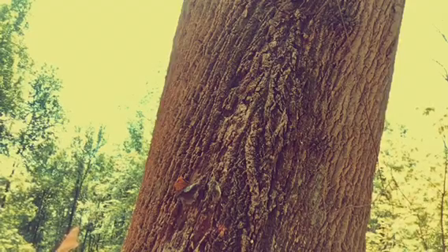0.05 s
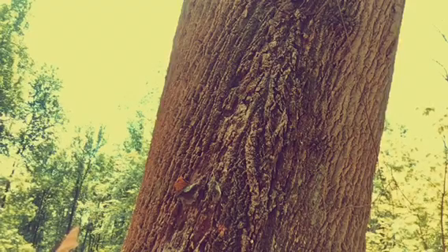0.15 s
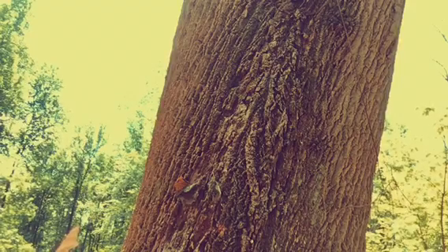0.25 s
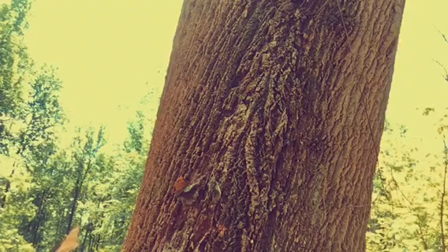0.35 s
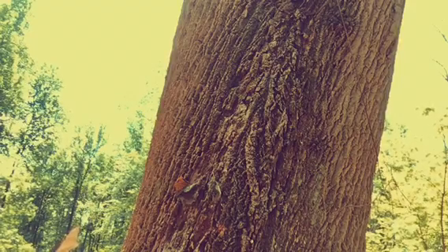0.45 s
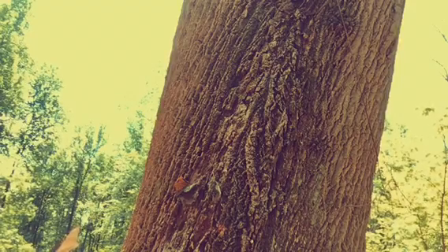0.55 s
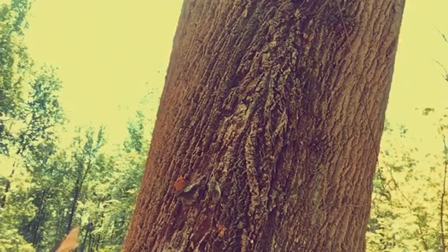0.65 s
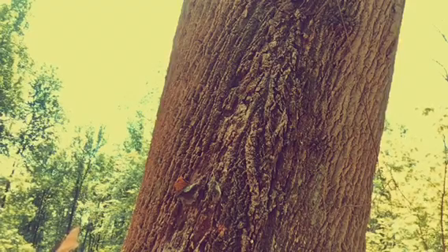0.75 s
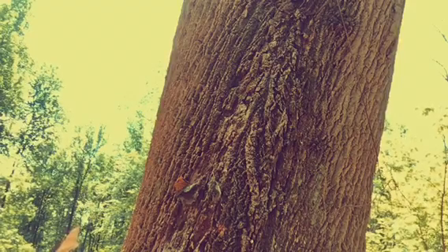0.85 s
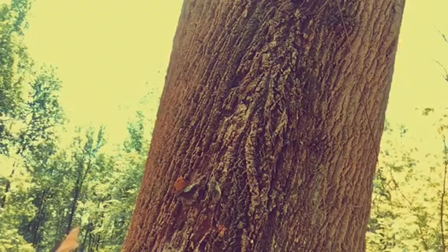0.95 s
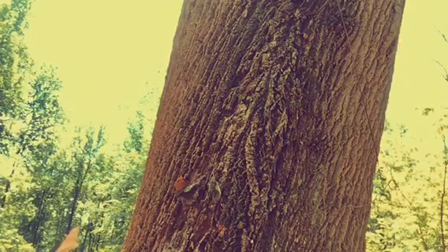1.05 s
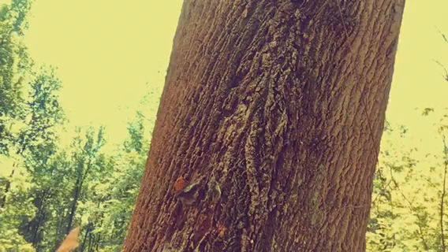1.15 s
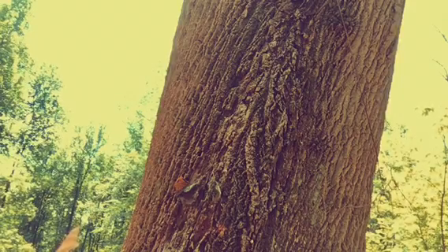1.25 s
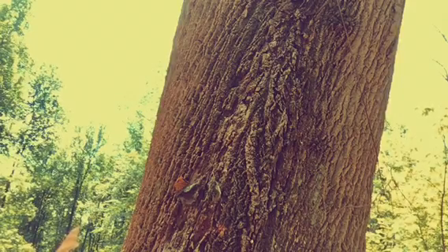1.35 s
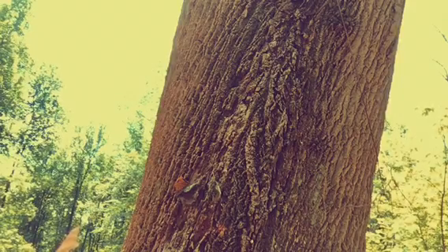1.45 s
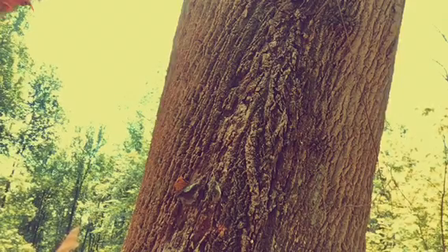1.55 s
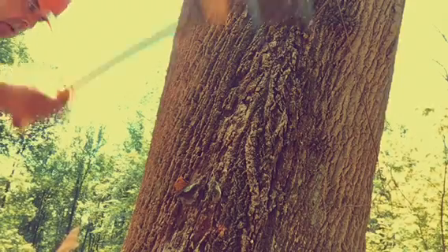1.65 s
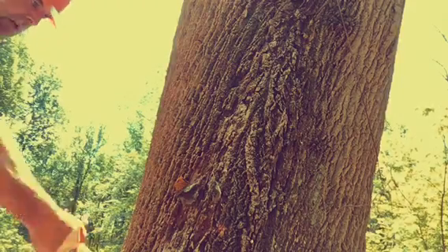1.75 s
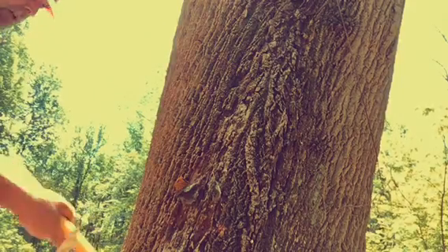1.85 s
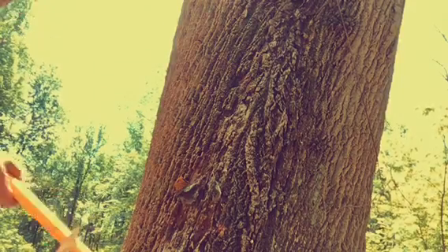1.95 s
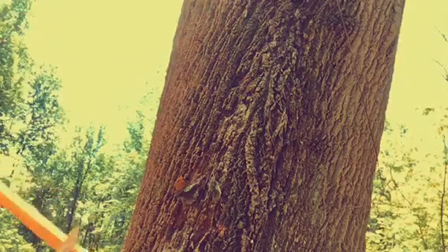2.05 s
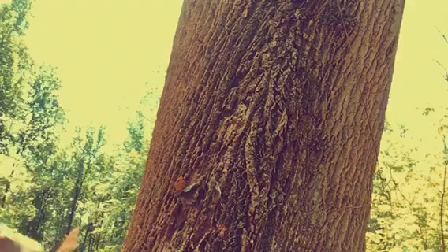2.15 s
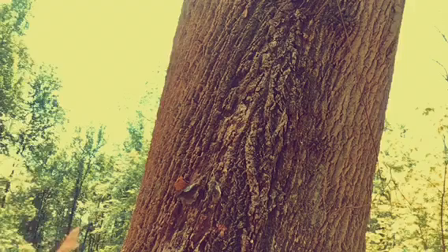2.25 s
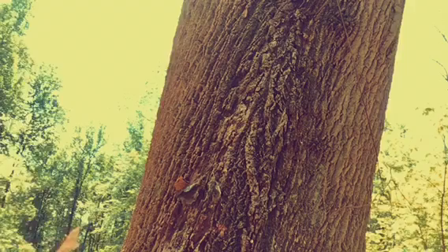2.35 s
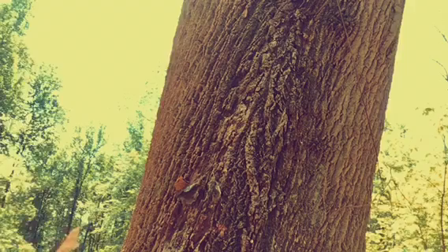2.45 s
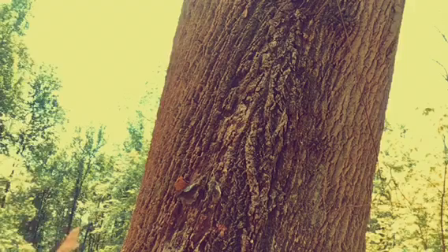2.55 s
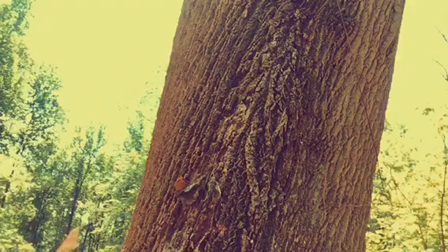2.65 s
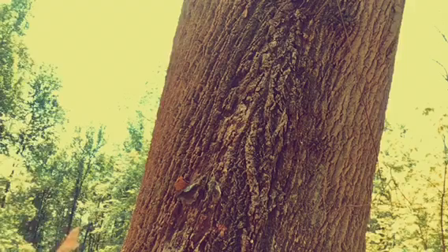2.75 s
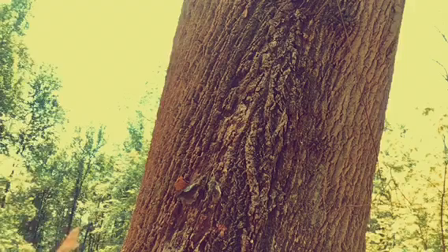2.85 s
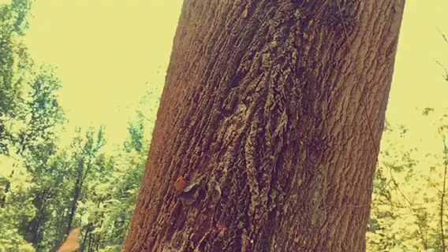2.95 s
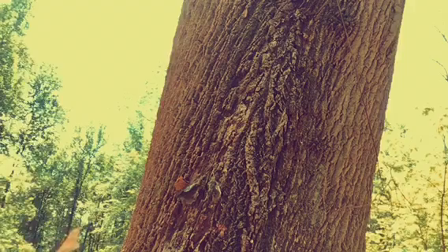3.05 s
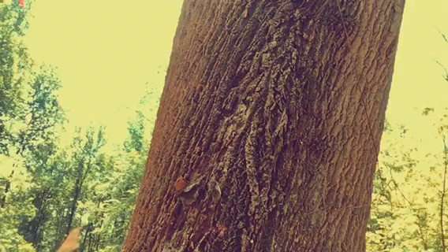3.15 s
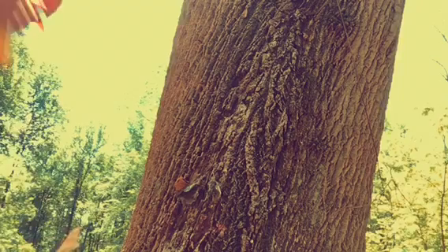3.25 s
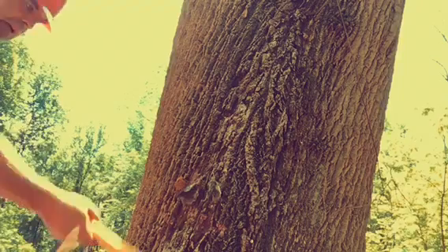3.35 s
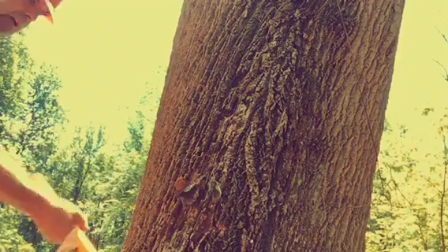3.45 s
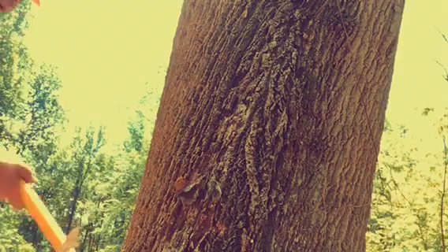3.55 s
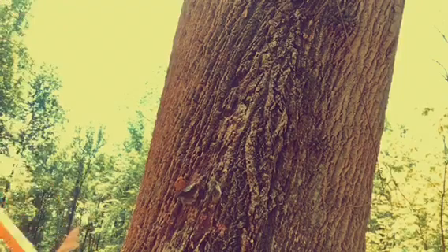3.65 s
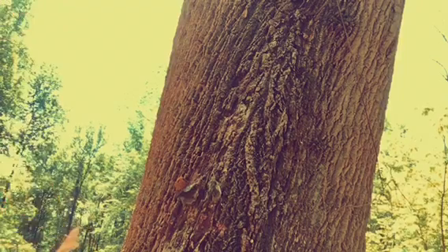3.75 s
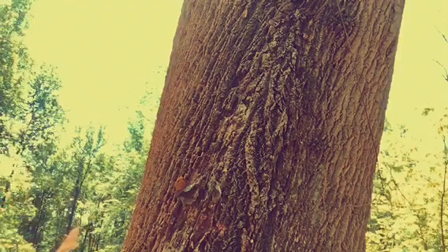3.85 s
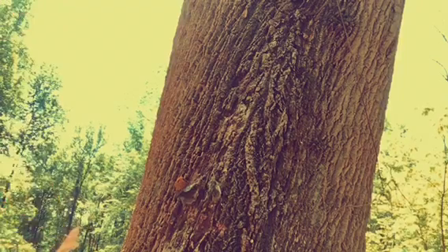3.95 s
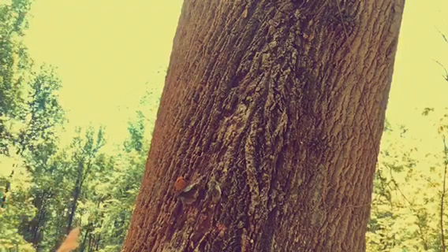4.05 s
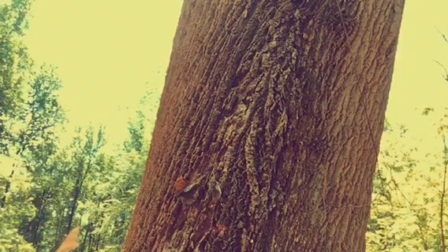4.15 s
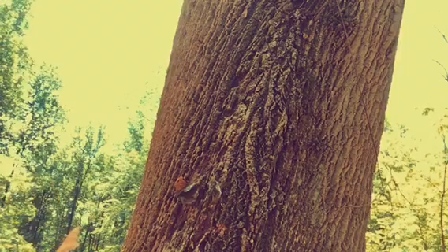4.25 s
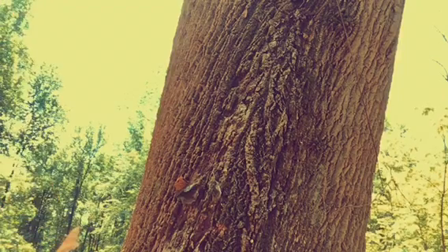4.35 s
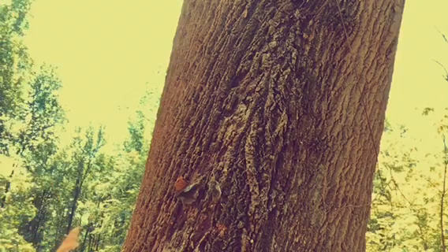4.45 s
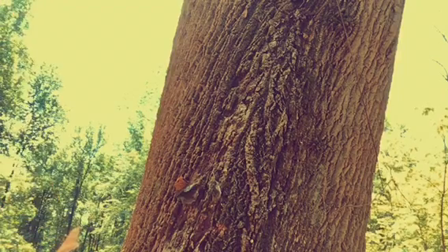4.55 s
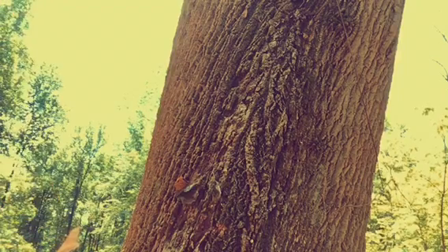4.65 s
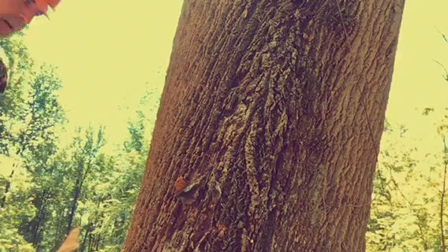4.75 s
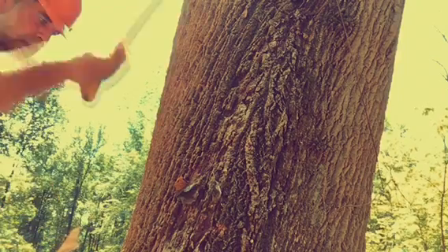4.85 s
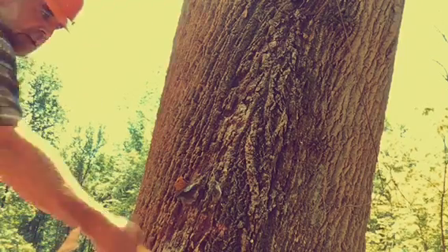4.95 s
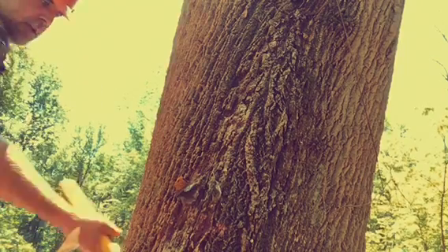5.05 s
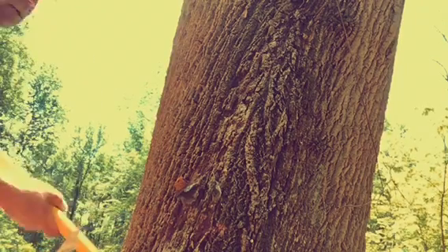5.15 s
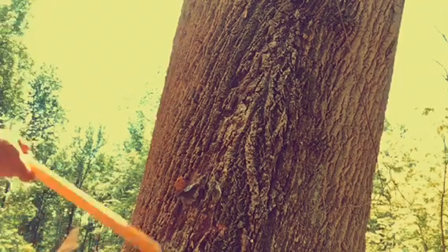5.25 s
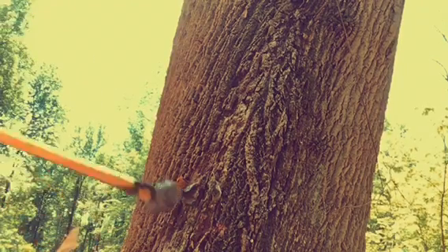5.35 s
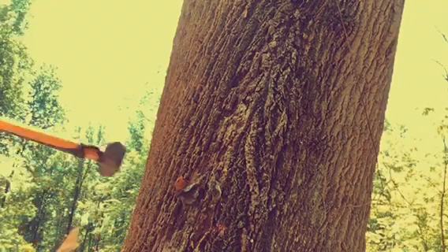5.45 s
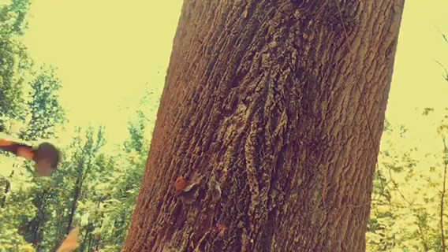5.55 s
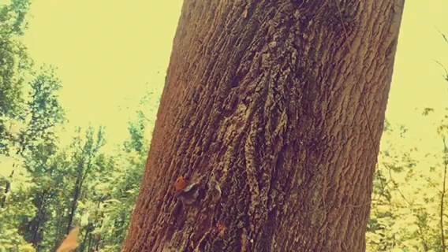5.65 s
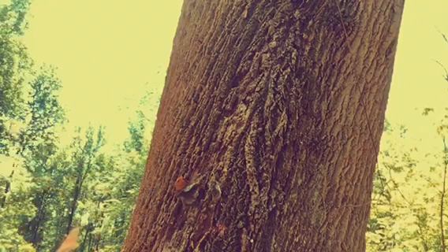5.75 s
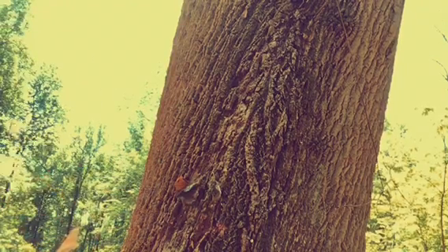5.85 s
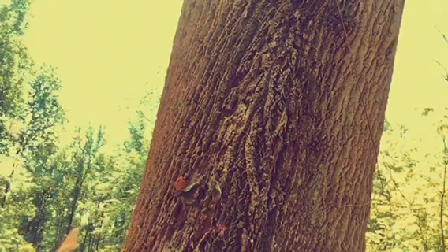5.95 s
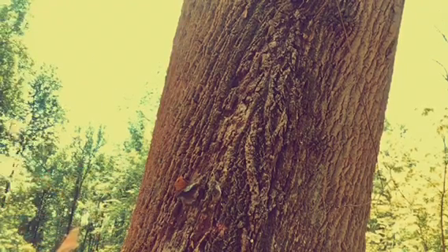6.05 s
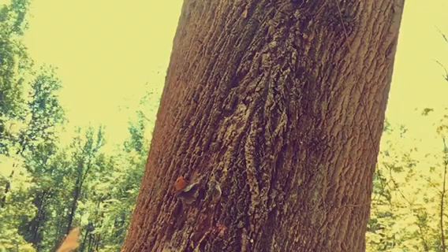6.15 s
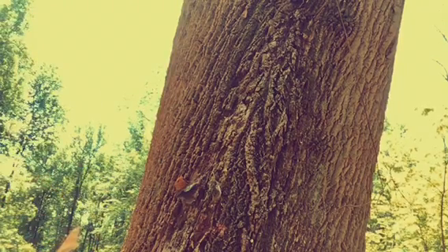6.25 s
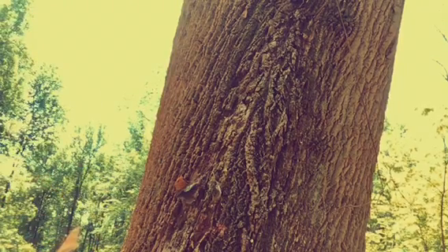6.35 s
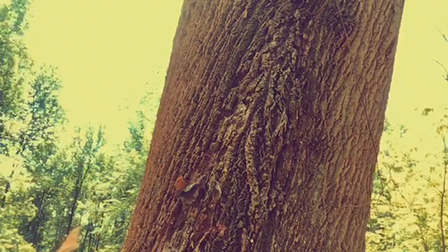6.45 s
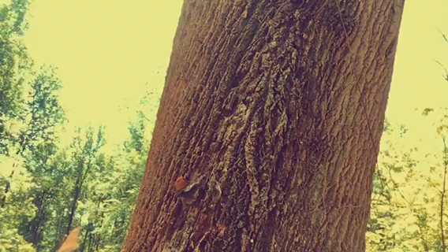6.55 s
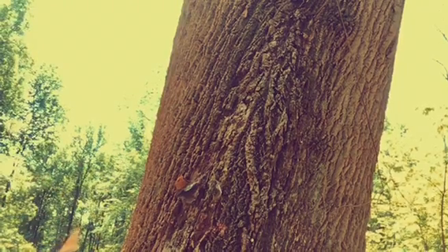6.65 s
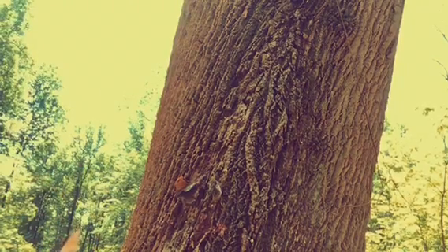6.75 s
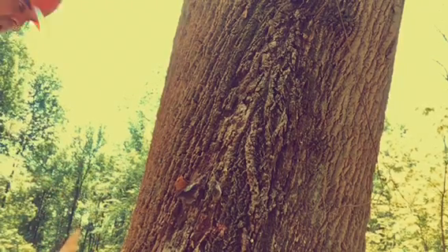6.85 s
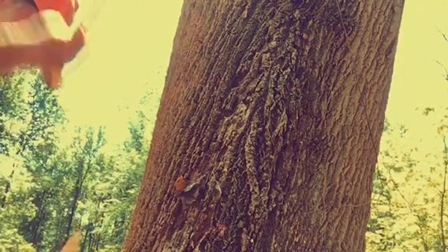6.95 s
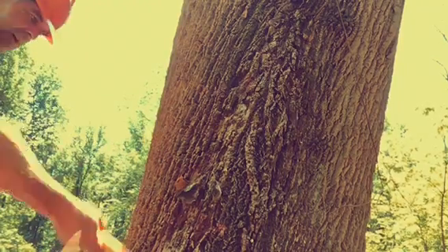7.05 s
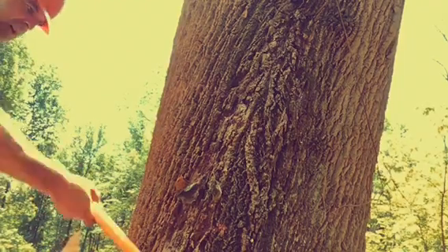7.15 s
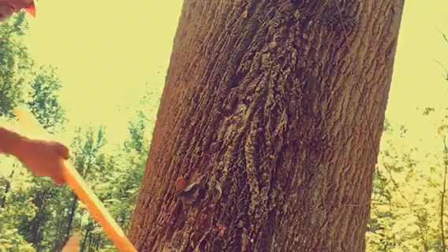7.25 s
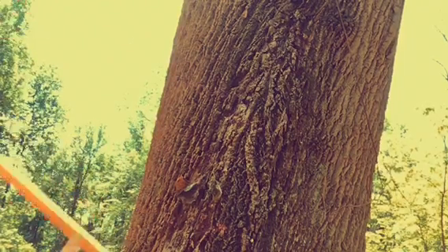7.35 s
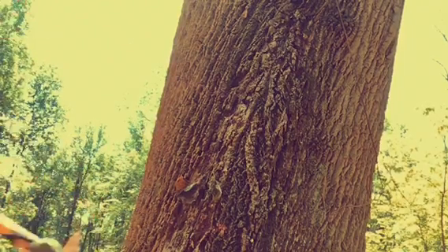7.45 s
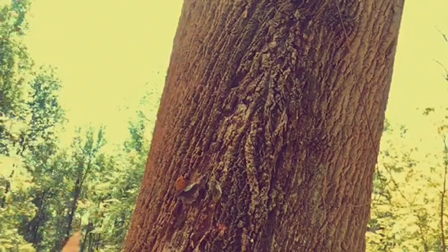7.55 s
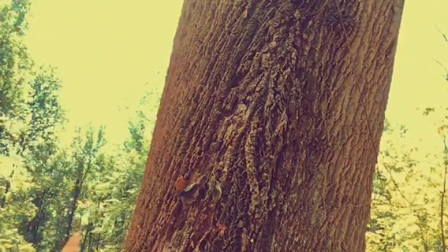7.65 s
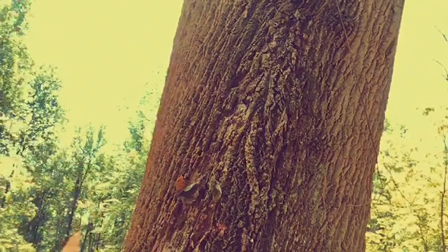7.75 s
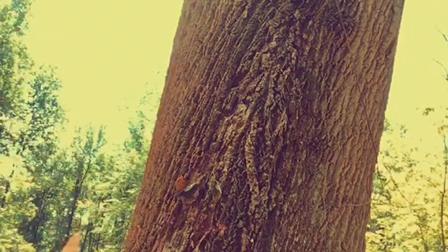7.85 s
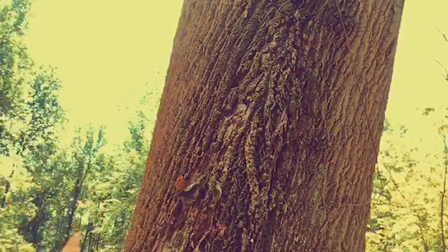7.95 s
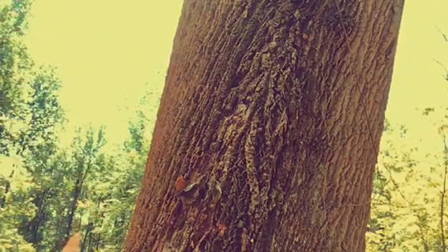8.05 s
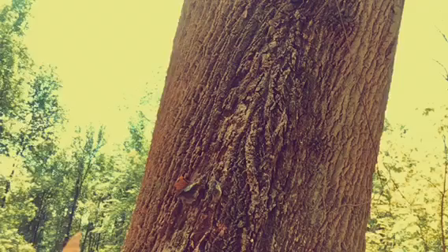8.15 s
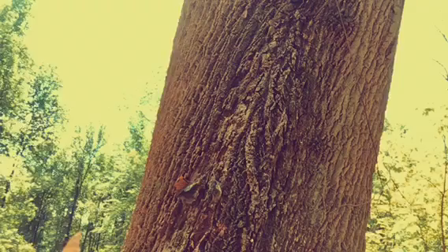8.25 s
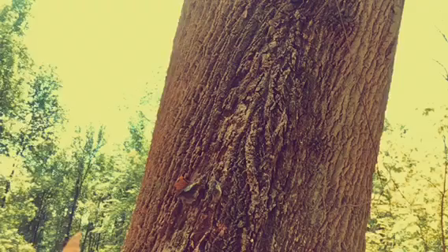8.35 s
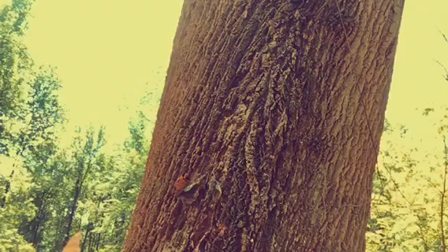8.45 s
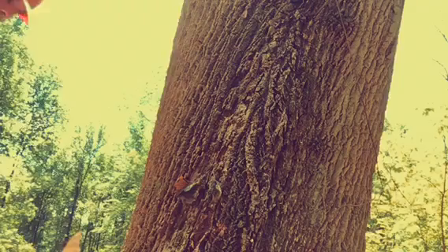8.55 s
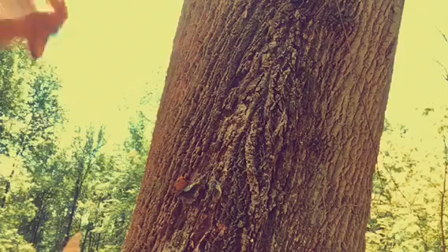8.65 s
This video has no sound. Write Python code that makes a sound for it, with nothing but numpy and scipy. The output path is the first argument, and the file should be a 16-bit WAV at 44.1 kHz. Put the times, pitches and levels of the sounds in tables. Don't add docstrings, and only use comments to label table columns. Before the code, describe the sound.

An axe chops a big tree four times, sharp overloaded cracks with woody thuds and forest echo, twigs snapping and leaf litter crackling between.

```python
import sys
import numpy as np
from scipy import signal
from scipy.fft import rfft, irfft
from scipy.io import wavfile

SR = 44100
rng = np.random.default_rng(int(sys.argv[2]) if len(sys.argv) > 2 else 0)


def to_wav(sig):
    pcm = np.clip(np.atleast_2d(sig), -1, 1) * 32767
    pcm = np.round(pcm).astype(np.int16)
    wavfile.write(sys.argv[1], SR, pcm.T)


def makeup_ratio(level_db):
    decades = np.asarray(level_db, float) / 20
    return 10 ** decades


N = 383229

# (t/s, crack level/dB, crack t60/s, knock level/dB, thud level/dB)
BLOWS = [
    (1.8258, 29.5, 0.026, 9.5, 2),
    (3.4549, 24.5, 0.017, 4.5, 19),
    (5.0436, 12, 0.042, 10, 4.5),
    (7.1410, 12.5, 0.041, 12.5, 6.5),
]
# (start t/s, end t/s, hiss level/dB, dull part over hiss/dB)
SHOWERS = [(0, 0.084, -53, -12), (0.384, 0.431, -44.5, -26), (0.771, 0.801, -36.5, -16),
           (0.809, 0.845, -41.5, -17), (1.021, 1.16, -41.5, -6.5), (2.51, 2.51, -29, -20),
           (2.533, 2.581, -24.5, -10.5), (4.331, 4.37, -43, -22), (4.777, 4.88, -46, -40),
           (4.925, 4.962, -42.5, -12), (5.389, 5.491, -29.5, -17), (6.029, 6.121, -33.5, -23),
           (7.082, 7.122, -46.5, 12), (7.884, 7.903, -34, -16)]
# (t/s, peak level/dB, centre f/Hz, pitch strength/dB)
TWIGS = [(0.77, -29, 2760, 8), (0.777, -21, 3200, 6), (0.789, -25, 2970, -3), (0.8012, -25, 4200, 3),
         (0.8253, -24, 4130, 5.5), (0.8295, -24, 4200, 7), (0.8395, -28, 4000, 3), (1.131, -19.5, 2290, 10),
         (1.783, -32, 3840, 21), (2.5133, -8.5, 3000, -2), (2.517, -14, 6000, -1), (2.5195, -13.5, 7200, 3),
         (2.522, -18, 7000, 2), (2.5404, -15, 4180, 2), (2.5563, 1.5, 4200, -6), (2.568, -1.5, 3300, -1.5),
         (2.572, -5, 3000, -0.5), (2.5748, -6, 4000, -6), (2.585, -13, 1500, 4), (2.595, -15, 4300, 3),
         (2.6309, -24, 5500, 5), (4.644, -10, 7000, -11.5), (5.4008, -17, 4500, -17), (5.405, -11, 1800, 7),
         (5.414, -6, 3800, -5), (5.417, -7, 1900, 6), (5.43, -12.5, 8900, 5.5), (5.432, -14, 1800, 9),
         (5.44, -9, 4000, -3), (5.4448, -0.5, 3700, -11), (5.4575, -7, 7000, -8), (5.4735, -10, 7500, -9),
         (5.4752, -11, 1780, 5), (5.4845, -20, 2500, -6), (5.4896, -10, 4500, -8),
         (5.647, -7.5, 1580, -3.5), (5.9588, -16, 8270, -13), (6.0402, -18.5, 2800, 2),
         (6.046, -15, 4000, 7), (6.051, -17, 3500, 10), (6.054, -16, 3000, 6), (6.069, -18, 2200, 5),
         (6.083, -17, 3700, 1), (6.1026, -12.5, 2170, 10.5), (6.1227, -18, 2540, 13),
         (6.1267, -17.5, 2400, 10), (6.828, -36, 6100, 11.5), (7.0848, -31, 2460, 16), (7.74, -1, 5670, 1),
         (7.7858, -11.5, 3700, -10), (7.887, -17.5, 5040, 11), (7.9144, -13.5, 3540, -1),
         (8.013, -29, 1760, 15)]
TICK_HZ, TICK_BUMP_DB = 2350, -12
TICK_T60_S, TWIG_T60_S = .013, .022


def rms_one(x):
    return x / np.sqrt(np.mean(x ** 2) + 1e-20)


def dying(t, t60):
    return (t >= 0) * makeup_ratio(-60 * np.maximum(t, 0) / t60)


def coloured(points, size=N):
    hz, level_db = np.transpose(points)
    f = np.maximum(np.fft.rfftfreq(size, 1 / SR), 1)
    gain = makeup_ratio(np.interp(np.log(f), np.log(hz), level_db, left=-60, right=-60))
    return rms_one(irfft(rfft(rng.standard_normal(size)) * gain, size))


def resonance(x, hz, width):
    r = np.exp(-np.pi * width / SR)
    poles = [1, -2 * r * np.cos(2 * np.pi * hz / SR), r * r]
    return signal.lfilter([(1 - r * r) / 2, 0, (r * r - 1) / 2], poles, x)


def drift(rate):
    knots = np.arange(0, N / SR + 1, 1 / rate)
    return np.interp(np.arange(N) / SR, knots, rng.standard_normal(len(knots)))


def add(out, s, x):
    i = round(s * SR)
    out[i:i + len(x)] += x[:N - i]


def bitten(x, bite):
    out = makeup_ratio(-19.0) * x
    for k, (hz, width, level_db) in enumerate(bite):
        out = out + (-1) ** k * makeup_ratio(level_db + 5.5) * resonance(x, hz, width)
    return out


def trunk_ring(t):
    # (f/Hz, level/dB, t60/s, direction of first swing)
    trunk_modes = [(42.1, 8.7, 0.119, 1), (54.4, -17.8, 0.764, -1), (64.3, -15.1, 0.96, -1),
                   (72.8, 10.4, 0.185, -1), (77.4, -19.8, 1.0, -1), (88.5, 5.1, 0.183, -1),
                   (95.0, 1.9, 0.331, 1), (105.5, 1.7, 0.298, 1), (115.3, -0.2, 0.235, 1),
                   (129.3, -3.8, 0.326, 1), (144.9, 8.9, 0.138, 1), (155.5, 2.7, 0.211, 1),
                   (187.6, -3.0, 0.146, -1), (215.4, -2.7, 0.242, -1), (231.8, 3.7, 0.127, -1),
                   (257.5, 1.1, 0.113, -1), (295.1, -37.8, 0.652, 1)]
    ring = 0
    for hz, level_db, t60, way in trunk_modes:
        ring = ring + way * makeup_ratio(level_db) * np.sin(2 * np.pi * hz * t) * dying(t, t60)
    return ring * np.minimum(t / 0.037, 1) ** 3.6


def blows():
    # (f/Hz, width/Hz, level/dB)
    bites = [
        [(1520, 380, 4), (2130, 500, 3), (3920, 780, -5), (5530, 2100, -7.5), (6590, 210, -4)],
        [(990, 1000, 1), (8720, 500, -7), (3500, 800, 1.5), (12000, 2500, -11), (4800, 1500, -1)],
        [(1110, 1030, 5.5), (2240, 150, -16), (3670, 170, -10), (6100, 2200, 0), (8500, 160, 4.5)],
        [(1130, 390, 0), (2145, 270, 0), (3750, 460, 2), (6160, 780, -31), (7000, 400, -17.5)],
    ]
    # (knock f/Hz, knock lag/s, thud f/Hz, thud lag/s, splinter level/dB)
    bodies = [(241, 0.0055, 56, 0.011, 8.5), (245, 0.0197, 80, 0.00068, 1.5),
              (258, 0.00907, 57, 0.0068, 11.5), (254, 0.00397, 66, 0.00774, 8)]
    # (f/Hz, width/Hz, t60/s)
    splinters = [(340, 290, 0.063), (445, 290, 0.057), (376, 187, 0.053), (382, 160, 0.066)]
    thud_decays = [0.098, 0.082, 0.15, 0.13]
    knock_decays = [0.056, 0.047, 0.044, 0.055]
    # (t/s, level/dB)
    trunk_swings = [(1.8303, 1.5), (3.4535, .5), (5.0426, 3), (7.1396, -.5)]
    # (t/s, f/Hz, level/dB, rise/s)
    early_push = (3.4443, 70, -5, .011)

    out, t = np.zeros(N), np.arange(SR) / SR
    short = t[:SR // 4]
    trunk = trunk_ring(t)
    for k, (s, crack_db, crack_t60, knock_db, thud_db) in enumerate(BLOWS):
        crack_noise, splinter_noise = rng.standard_normal((2, SR // 4))
        knock_hz, knock_lag, thud_hz, thud_lag, splinter_db = bodies[k]
        splinter_hz, splinter_width, splinter_t60 = splinters[k]

        crack = crack_noise * dying(short, crack_t60) * np.minimum(short / .0007, 1)
        add(out, s, makeup_ratio(crack_db) * bitten(crack, bites[k]))

        splinter = resonance(splinter_noise * dying(short, splinter_t60), splinter_hz, splinter_width)
        add(out, s + .004, makeup_ratio(splinter_db + 12.5) * splinter)

        knock = np.sin(2 * np.pi * knock_hz * short) * dying(short, knock_decays[k])
        add(out, s + knock_lag, makeup_ratio(knock_db) * knock * np.minimum(short / 0.0037, 1))

        thud = np.sin(2 * np.pi * thud_hz * short) * dying(short, thud_decays[k])
        add(out, s + thud_lag, makeup_ratio(thud_db) * thud * np.minimum(short / 0.005, 1) ** 2)

        swing_s, swing_db = trunk_swings[k]
        add(out, swing_s, makeup_ratio(swing_db) * trunk)

    s, hz, level_db, rise = early_push
    push = np.sin(2 * np.pi * hz * t) * np.minimum(t / rise, 1) * dying(np.maximum(t - rise, 0), .025)
    add(out, s, -makeup_ratio(level_db) * push)
    return out


def steel():
    # (t/s, then level/dB of each mode)
    steel_hits = [
        (1.895, -35.5, -56, -58),
        (3.48, -48, -49, -36),
        (5.062, -30, -27, -23),
        (7.17, -54, -61, -56),
    ]
    # (f/Hz, t60/s)
    steel_modes = [(9530, 0.9), (8100, 0.1), (12600, 0.14)]
    out, t = np.zeros(N), np.arange(SR) / SR
    for s, *levels_db in steel_hits:
        for (hz, t60), level_db in zip(steel_modes, levels_db):
            pair = np.sin(2 * np.pi * hz * t) + 0.25 * np.sin(2 * np.pi * (hz + 17) * t)
            add(out, s, makeup_ratio(level_db) * pair * dying(t, t60) * np.minimum(t / 0.0027, 1))
    return out * makeup_ratio(3.5 * drift(45))


def snaps(rows, low_hz, high_hz):
    out, t = np.zeros(N), np.arange(4000) / SR
    for s, peak_db, hz, t60, bump_db in rows:
        burst = rng.standard_normal(len(t)) * dying(t, t60)
        burst[0] += 1.8
        bump = resonance(burst * dying(t, 0.29), hz, 0.18 * hz)
        add(out, s, makeup_ratio(peak_db - 16.5) * (burst + makeup_ratio(bump_db + 13.0) * bump))
    return signal.sosfilt(signal.butter(2, [low_hz, high_hz], "band", fs=SR, output="sos"), out)


def grazes():
    # (t/s, peak level/dB, centre f/Hz, t60/s, bump level/dB)
    bark_grazes = [(1.8085, -4, 1520, 0.018, -2), (1.82, -5, 1710, .03, -2), (3.4324, 5, 1700, 0.012, -6),
                   (3.4362, -3, 2300, 0.014, 0), (3.4440, 1.5, 1420, 0.0093, 2), (5.021, -3, 900, 0.022, 0),
                   (5.0326, -7, 1500, 0.02, -5), (7.1130, -20.5, 600, 0.024, 15),
                   (7.1180, -8.5, 7200, 0.0077, 1.5), (7.1185, -6.5, 3670, 0.009, 11.5),
                   (7.1297, -7, 3600, 0.0083, 5.5)]
    return snaps(bark_grazes, low_hz=400, high_hz=14000)


def tearing():
    # (length/s, level/dB)
    tears = [
        (0.088, -37),
        (.095, -38),
        (.095, -30),
        (.085, -41),
    ]
    # (f/Hz, level/dB per Hz)
    tear_colour = [(500, 1), (2000, 3), (4000, 2), (8000, -8), (12000, -9), (16000, -16)]
    t, gain = np.arange(N) / SR, 0
    for (s, *_), (length, level_db) in zip(BLOWS, tears):
        fade = makeup_ratio(level_db - 9 * (t - s) / length * (t < s + length))
        gain = gain + fade * (t > s) * dying(np.maximum(t - s - length, 0), .05)
    return gain * makeup_ratio(3.0 * drift(120)) * coloured(tear_colour)


def wood_echo():
    # (f/Hz, near trees level/dB, near t60/s, far edge level/dB, far t60/s)
    wood_bands = [(413, 9.5, 0.25, -23.5, 3.4), (927, -0.5, 0.39, -11, 2.53), (1870, 5, 0.4, -10, 2.22),
                  (4200, 2, 0.44, -17, 1.63), (7500, 8, 0.26, -16, 0.89), (14000, 14, 0.16, -36.5, .7)]
    front_s, far_edge_s = .203, .25
    t, near, far = np.arange(round(1.5 * SR)) / SR, 0, 0
    arrival = np.where(t < front_s, .55 * (t / front_s) ** 2, 1)
    for hz, near_db, near_t60, far_db, far_t60 in wood_bands:
        band = resonance(resonance(rng.standard_normal(len(t)), hz, hz), hz, hz) / np.sqrt(hz / 1000)
        near = near + band * makeup_ratio(near_db) * dying(t - .006, near_t60)
        far = far + band * makeup_ratio(far_db) * arrival * dying(np.maximum(t - far_edge_s, 0), far_t60)
    return near, far


def banded(x, bands):
    f, power = np.fft.rfftfreq(len(x), 1 / SR), 1
    for hz, width, lift_db in bands:
        power = power + makeup_ratio(2 * lift_db) / (1 + np.abs(2 * (f - hz) / width) ** 3)
    return irfft(rfft(x) * np.sqrt(power), len(x))


def echoes():
    # (near trees level/dB, far edge level/dB)
    echo_levels = [
        (-17.5, -15),
        (-20, -19.5),
        (-15.5, -18),
        (-28.5, -25),
    ]
    # (f/Hz, width/Hz, level over the broad echo/dB)
    echo_bands = [
        [(955, 1300, -1.5), (1870, 430, 4), (3930, 470, 4.5), (5970, 480, 6), (7000, 600, 4.5)],
        [(3300, 680, 11.5), (4400, 500, 14.5), (6000, 770, 12), (8450, 450, 8.5), (11900, 400, 4)],
        [(1300, 600, -5), (2000, 600, -14), (3900, 920, 7), (6370, 1000, 5.5), (12700, 250, 13)],
        [(1100, 970, 9.5), (2090, 310, 10.5), (3800, 740, 16), (5640, 1200, 6.5), (7200, 800, 5)],
    ]
    out, (near, far) = np.zeros(N), wood_echo()
    for (s, *_), (near_db, far_db), bands in zip(BLOWS, echo_levels, echo_bands):
        add(out, s, banded(makeup_ratio(near_db) * near + makeup_ratio(far_db) * far, bands))
    return out


def ticks():
    # (t/s, peak level/dB)
    bark_ticks = [(0.05, -24), (0.33, -21.5), (0.7847, -9), (1.047, -14), (1.5469, -23), (1.61, -21.5),
                  (1.671, -29), (2.4107, -11.5), (2.427, -13.5), (2.799, -15), (3.04, -22), (3.148, -16.5),
                  (3.28, -14.5), (4.1365, -12.5), (4.1729, -19), (4.344, -21), (4.5586, -11.5),
                  (4.7116, -14.5), (4.784, -21), (4.8643, -21), (4.9382, -26), (5.5844, -26), (5.6294, -11),
                  (5.709, -26), (5.7661, -13), (5.968, -8), (6.179, -13.5), (7.0057, -22), (7.759, -17),
                  (8.3587, -28)]
    return [(s, peak_db, TICK_HZ, TICK_T60_S, TICK_BUMP_DB) for s, peak_db in bark_ticks]


def twigs():
    return [(s, peak_db, hz, TWIG_T60_S, bump_db) for s, peak_db, hz, bump_db in TWIGS]


def landings():
    gap_s, rows = .014, []
    for start, end, hiss_db, dull_db in SHOWERS:
        if dull_db >= 0:
            continue
        jitter, size, pitch = rng.standard_normal((3, 12))
        times = start + gap_s * (np.arange(12) + .25 * jitter)
        for s, strength, tune in zip(times, size, pitch):
            free = min(abs(s - twig[0]) for twig in TWIGS) > gap_s
            if start <= s < end and free:
                rows.append((s, hiss_db + 17 + 3.5 * strength, 2600 * 1.25 ** tune, TWIG_T60_S, 0))
    return rows


def strays():
    rows = []
    for s, *_ in BLOWS:
        for delay in rng.exponential(.6, 14):
            if s + .3 + delay < N / SR - .1:
                rows.append((s + 0.35 + delay, -44, TICK_HZ, TICK_T60_S, TICK_BUMP_DB))
    return rows


def crumbs():
    # (t/s, peak level/dB, centre f/Hz, pitch strength/dB)
    more_crumbs = [(0.826, -13, 4100, -2), (0.87, -23, 6000, -3), (0.9, -22, 4500, 0),
                   (1.1, -22, 5000, -3.5), (1.13, -20, 1500, 11), (1.15, -24, 5000, -3),
                   (2.606, -18, 9000, -6), (2.648, -22, 7000, -4.5), (2.658, -22, 8000, -4),
                   (2.672, -19, 6000, -4), (2.7014, -18, 4500, -5), (2.7288, -23, 5000, -5),
                   (2.738, -23.5, 9000, -9), (2.7792, -23, 3490, -2), (2.8316, -24, 1730, 0),
                   (3.975, -41, 9000, 11), (4.183, -28.5, 3000, -3), (5.36, -19, 9500, 1),
                   (5.505, -12, 6000, -4.5), (5.53, -19.5, 8000, -4), (5.9578, -22, 12000, -3),
                   (6.1673, -26, 1730, 8), (6.033, -21, 4000, 3), (6.036, -21, 9000, -5),
                   (7.0848, -18, 2400, 3), (7.695, -36, 8000, -0.5), (7.724, -31, 5000, -3),
                   (7.741, -11, 2200, -2), (7.7405, -10, 7500, -2), (7.889, -20, 1800, 5),
                   (7.852, -26, 11000, 0), (7.87, -21, 4000, -0.5)]
    rows = [(s, peak_db, hz, TICK_T60_S, bump_db) for s, peak_db, hz, bump_db in more_crumbs]
    return snaps(rows, low_hz=1300, high_hz=15000)


def thumps():
    # (t/s, peak level/dB, f/Hz, t60/s)
    footfalls = [(1.128, -24, 270, 0.023), (1.13, -23.5, 820, 0.05), (1.1288, -26.5, 1700, 0.049),
                 (3.433, -19, 650, 0.04), (7.112, -25, 410, .05), (2.559, -29.5, 256, 0.21),
                 (6.102, -32, 280, 0.16), (6.1035, -17.5, 1630, 0.039), (5.299, -35.5, 290, 0.99),
                 (6.708, -26, 305, 0.1), (6.712, -28.5, 570, 0.11), (6.946, -29.5, 260, 0.046),
                 (7.739, -32, 360, 0.052), (8.019, -37, 470, 0.045)]
    out, t = np.zeros(N), np.arange(8000) / SR
    for s, peak_db, hz, t60 in footfalls:
        burst = rng.standard_normal(len(t)) * dying(t, t60)
        dull = resonance(resonance(burst, hz, 0.49 * hz), hz, 0.83 * hz)
        add(out, s, makeup_ratio(peak_db) * dull / np.abs(dull).max())
    return out


def swell(peak_s, rise, fall):
    t = np.arange(N) / SR - peak_s
    return makeup_ratio(-16 * np.maximum(-t / rise, t / fall))


def litter():
    # (peak t/s, rise/s, fall/s, hiss level/dB, dull level/dB)
    shuffles = [
        (0.88, 0.15, 0.4, -47, -48),
        (1.43, 0.79, 0.25, -55, -56),
        (2.6, 0.48, 0.3, -42.5, -55),
        (4.0, 0.14, 0.19, -51.5, -50),
        (5.27, 0.059, 0.46, -37.5, -38),
        (5.45, 0.3, 0.17, -33.5, -34),
        (6.1, 0.14, 0.15, -39.5, -41),
        (6.75, 0.083, 0.11, -53.5, -47),
        (7.88, 0.32, 0.12, -54, -78),
    ]
    # (f/Hz, level/dB per Hz)
    leaf_colour = [(2000, 2.5), (3500, 8), (6000, 4.5), (9500, -0.5), (10500, -7), (12000, -1.5),
                   (15000, -8.5), (16500, -6)]
    chip_colour = [(1500, -3.5), (2500, -1), (6000, -1.5), (9500, -4.5), (10500, -13), (12000, -7),
                   (15000, -15), (16500, -12)]
    dull_colour = [(400, 4.0), (800, 6.0), (1800, 5.5), (2800, -1.5), (3500, -21.0)]

    t, chips = np.arange(N) / SR, np.zeros(N)
    hiss, dull = makeup_ratio(-56.5) + chips, makeup_ratio(-52.5) + chips
    windups = [(s, .19, .05, -47, -39) for s, *_ in BLOWS]
    for peak_s, rise, fall, hiss_db, dull_db in shuffles + windups:
        stir = swell(peak_s, rise, fall)
        hiss += makeup_ratio(hiss_db) * stir
        dull += makeup_ratio(dull_db - 5.0) * stir
    for start, end, hiss_db, dull_db in SHOWERS:
        shower = np.clip((t - start) / 0.013, 0, 1) * dying(np.maximum(t - end, 0), .06)
        chips += makeup_ratio(hiss_db) * shower
        dull += makeup_ratio(hiss_db + dull_db) * shower

    born = rng.random(N) < 250 / SR
    sizes = makeup_ratio(1.5 * np.minimum(rng.exponential(1, N), 4))
    crackle = signal.lfilter([1], [1, -.99], born * sizes + 1e-18)
    grain = rms_one((2.9 + crackle) * makeup_ratio(-2.0 * drift(40)))
    patter = rms_one(1.1 + crackle)
    leaves = hiss * coloured(leaf_colour) + dull * coloured(dull_colour)
    return patter * chips * coloured(chip_colour) + grain * leaves


def bird():
    # (start t/s, length/s, first f/Hz, last f/Hz, level/dB)
    whistles = [
        (2.89, .11, 2905, 2915, -49),
        (3.01, .1, 2895, 2905, -47),
        (3.07, .08, 2915, 2945, -53),
        (2.995, .11, 2045, 2150, -50),
        (3.07, .17, 2145, 2145, -49),
        (3.2, .12, 2130, 2140, -56),
        (3.13, .14, 2730, 2800, -54),
        (3.22, .14, 2780, 2730, -55),
        (3.31, .13, 2745, 2780, -55),
    ]
    out, wobble = np.zeros(N), 16 * drift(40)
    for s, length, first_hz, last_hz, level_db in whistles:
        part = np.linspace(0, 1, round(length * SR))
        hz = first_hz + (last_hz - first_hz) * part + wobble[round(s * SR):][:len(part)]
        tone = np.sin(2 * np.pi * np.cumsum(hz) / SR)
        add(out, s, makeup_ratio(level_db + 2.5) * np.abs(np.sin(np.pi * part)) ** .8 * tone)
    return out * makeup_ratio(2.5 * drift(31.0))


def background():
    # (level/dB, t60/s)
    shakes = [
        (1, 1.06),
        (5.5, 0.77),
        (7, 1.25),
        (5.5, 0.72),
    ]
    # (t/s, level/dB)
    rumble_path = [(0, -1.5), (1.2, -0.5), (2.9, -0.5), (4, -3), (4.8, 1), (5.8, -1.5), (6.8, 0.5),
                   (7.7, -2.5), (8.69, -1.5)]
    drone_path = [(0, -40), (.5, -36.5), (1.8, -37), (2.8, -43), (4.5, -54), (6.6, -51.5), (8.0, -44),
                  (8.69, -54.5)]
    # (f/Hz, level/dB per Hz)
    rumble_colour = [(12, -66), (20, -38), (39, -8), (59, 2.5), (129, -13), (156, -11.5), (189, -12.5),
                     (315, -21.5), (400, -26), (520, -82), (880, -120)]
    drone_colour = [(70, -29), (100, 1.5), (140, -2.5), (200, -12), (280, -28), (400, -36)]
    air_colour = [(180, 0), (300, -6), (455, 4.5), (1640, 1), (3460, -3), (4910, -13.5), (8790, -24),
                  (10400, -34), (12500, -29), (16500, -29)]

    t, shake = np.arange(N) / SR, 0
    for (s, *_), (shake_db, t60) in zip(BLOWS, shakes):
        shake = shake + makeup_ratio(shake_db) * dying(t - s, t60)
    rumble = makeup_ratio(-38.5 + np.interp(t, *np.transpose(rumble_path))) + makeup_ratio(-31) * shake
    rumble = rumble * makeup_ratio(1.54 * drift(8.7) + 0.36 * drift(2.9)) * coloured(rumble_colour)
    drone = makeup_ratio(np.interp(t, *np.transpose(drone_path))) + makeup_ratio(-32.5) * shake
    drone = drone * makeup_ratio(1.7 * drift(4.6)) * coloured(drone_colour)
    air = makeup_ratio(-50 + 1.3 * drift(5.5)) * coloured(air_colour)
    return rumble + drone + air


def scene():
    axe = blows() + steel() + grazes() + tearing() + echoes()
    debris = snaps(ticks() + twigs() + landings() + strays(), low_hz=1250, high_hz=12800) + crumbs()
    ground = debris + thumps() + litter()
    return (axe + ground + bird() + background())[None]


def low_pass(x):
    return signal.sosfilt(signal.butter(12, 15800, fs=SR, output="sos"), x)


def record(dry):
    rolloff = signal.butter(10, 16700, fs=SR, output="sos")
    mix = signal.sosfilt(rolloff, np.clip(dry, -1, 1))
    return low_pass(mix)


dry = scene()
out = record(dry)
to_wav(out)
```